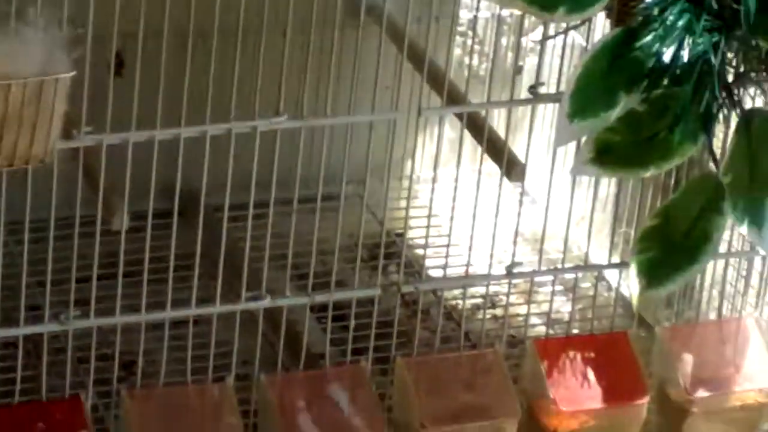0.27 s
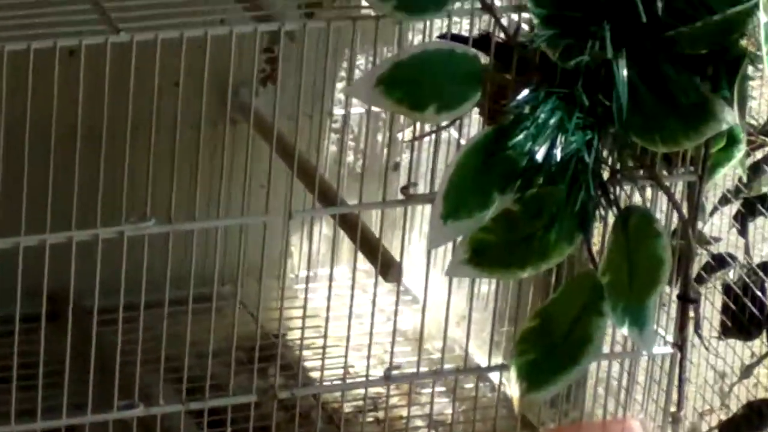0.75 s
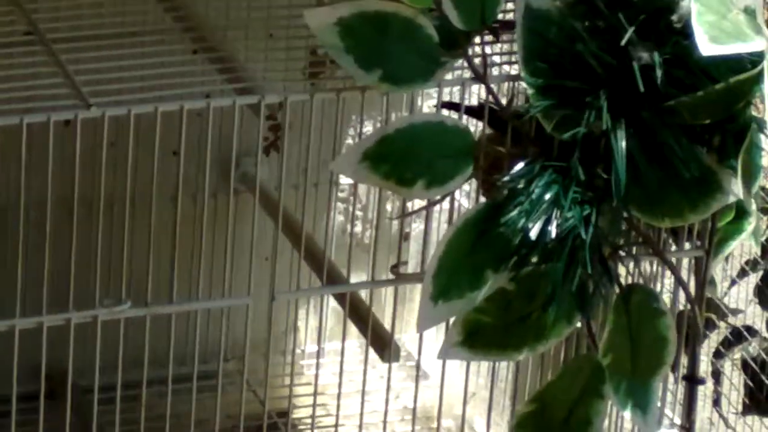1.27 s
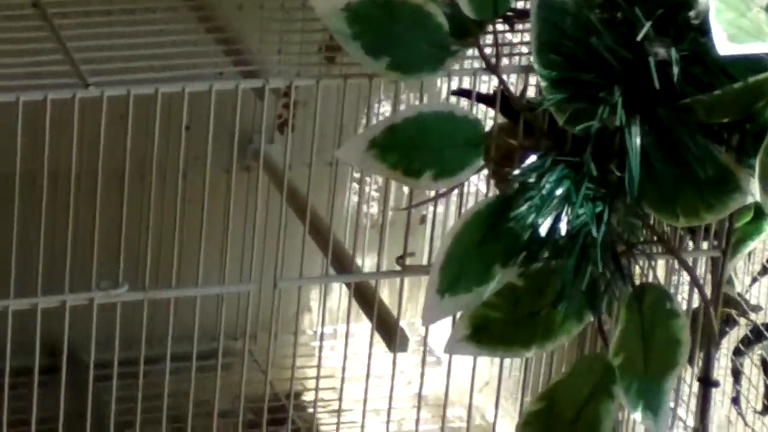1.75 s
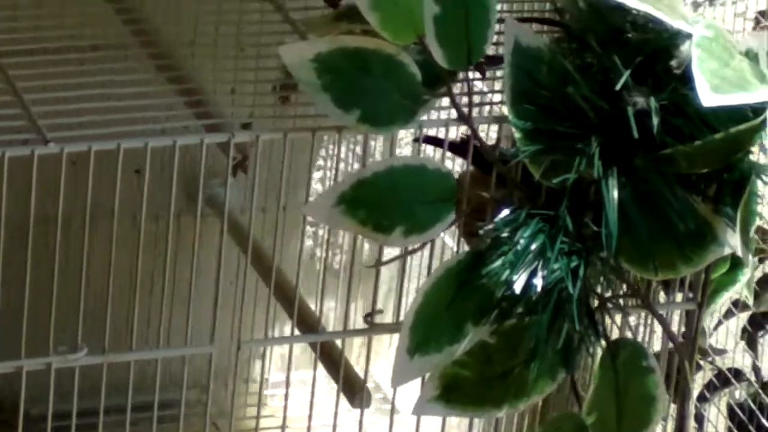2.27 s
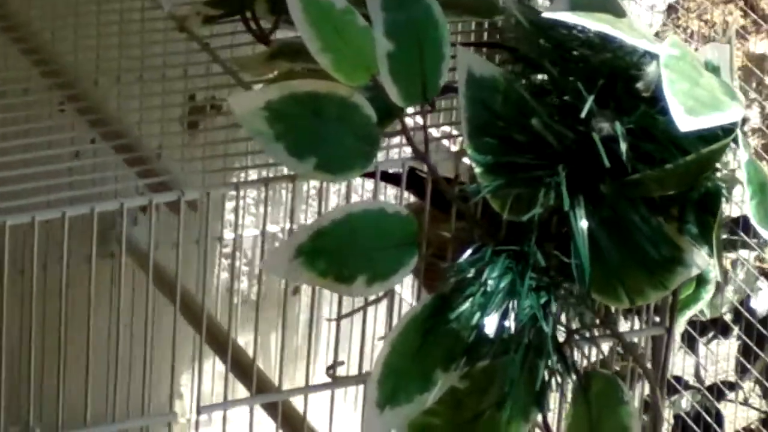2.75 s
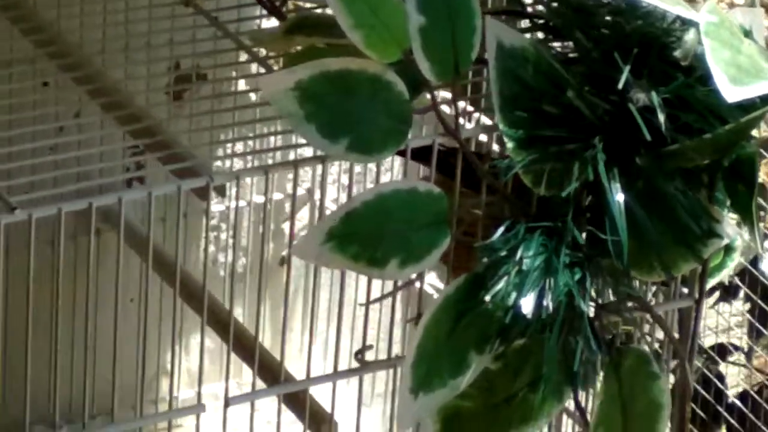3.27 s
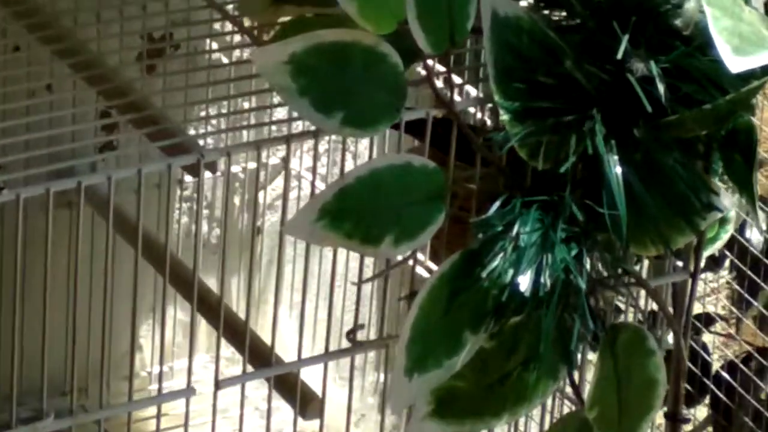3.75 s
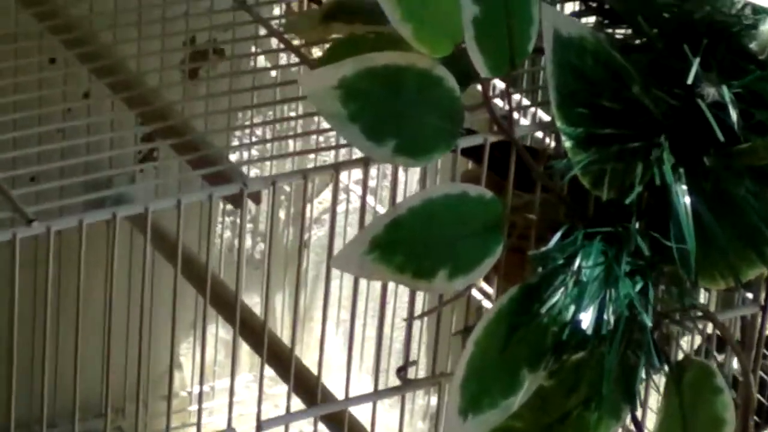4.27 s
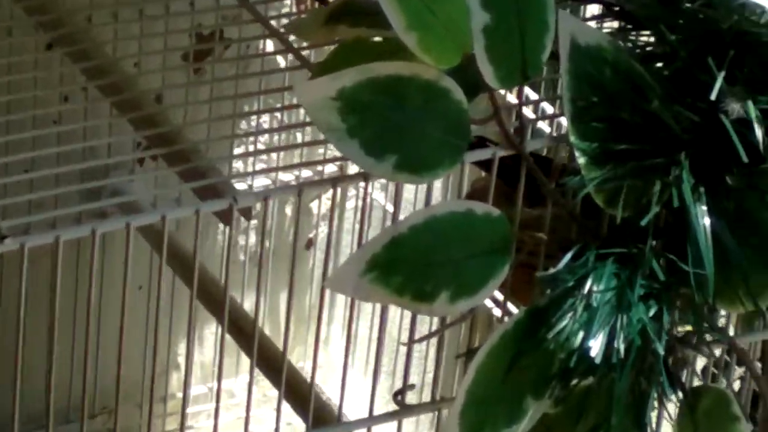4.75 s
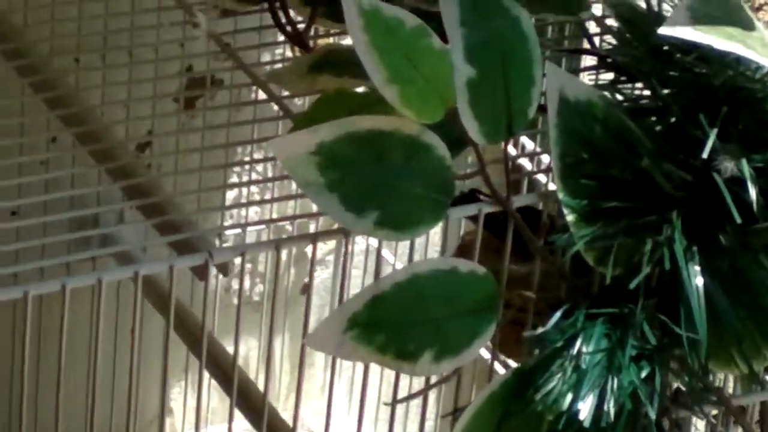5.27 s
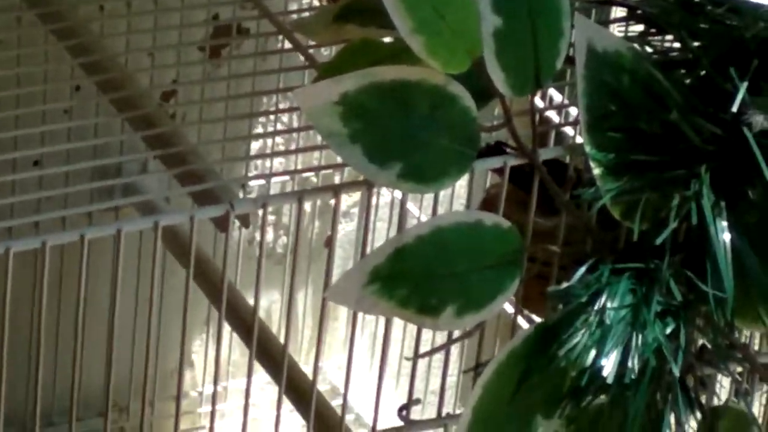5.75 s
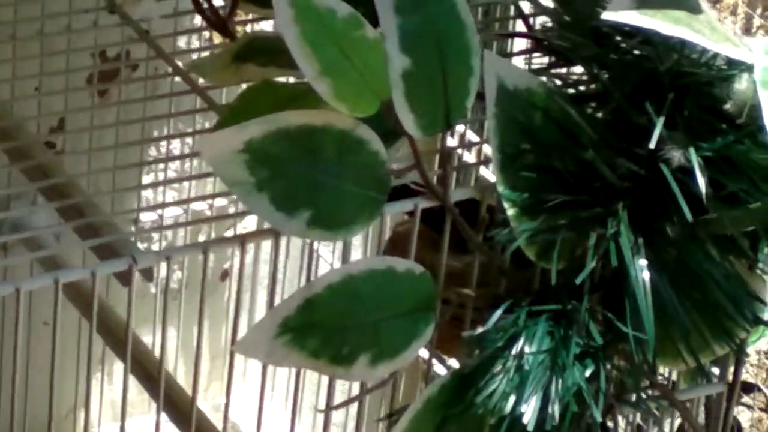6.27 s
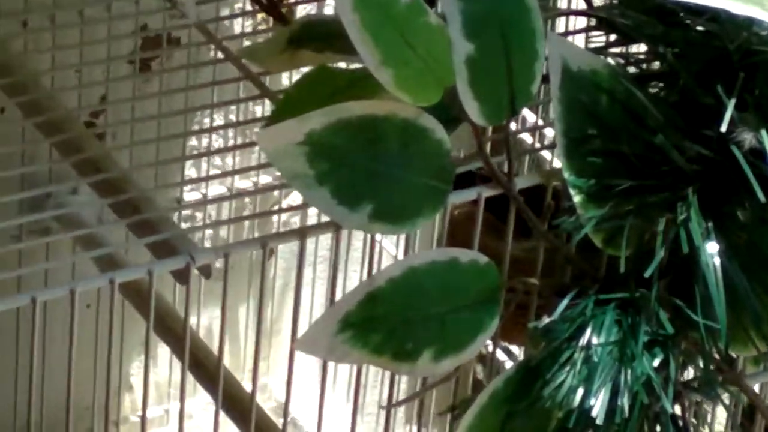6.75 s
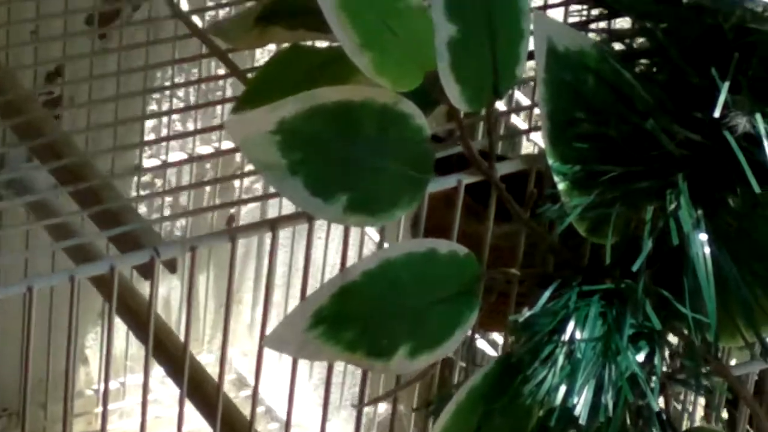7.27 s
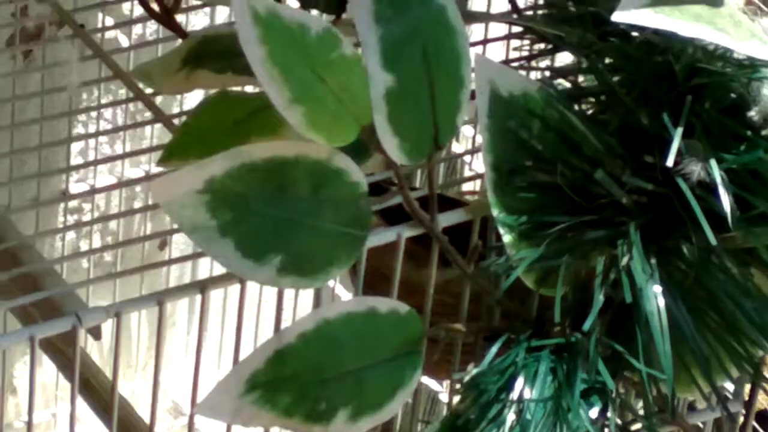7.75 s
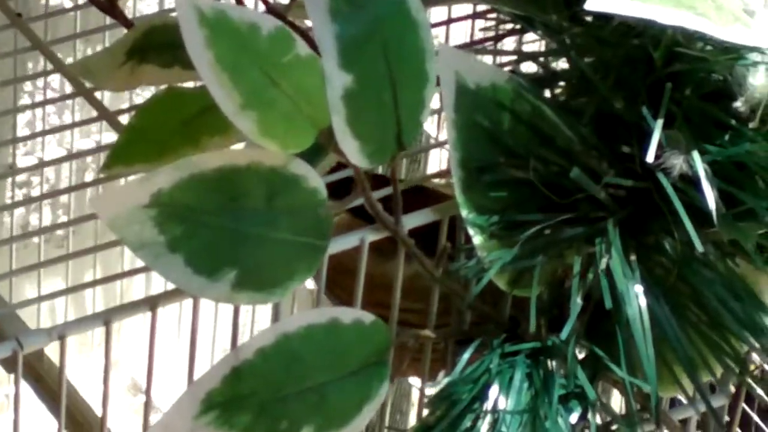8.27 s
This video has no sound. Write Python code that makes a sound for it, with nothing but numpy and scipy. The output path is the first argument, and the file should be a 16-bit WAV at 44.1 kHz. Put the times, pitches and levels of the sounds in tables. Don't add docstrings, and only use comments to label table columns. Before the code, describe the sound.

Small finches in a wire aviary with hard walls. Faint distant chirps and falling whistles come first, then two loud plastic ticks of fingers on the camera. Low chips and a soft flurry of wings follow, then spaced quick high tweets. A denser burst near the end brings a rising glide, a short buzz and a falling whistle, then another dull tick. Quiet room air, mono, close hand-held microphone.

```python
import sys
import numpy as np
from scipy import signal
from scipy.fft import rfft, irfft, next_fast_len
from scipy.io import wavfile
from scipy.ndimage import map_coordinates

SR = 44100
rng = np.random.default_rng(int(sys.argv[2]) if len(sys.argv) > 2 else 0)


def unload_audio(sound):
    columns = np.transpose(np.atleast_2d(sound))
    steps = np.round(np.clip(columns, -1, 1) * 32767)
    wavfile.write(sys.argv[1], SR, steps.astype(np.int16))


def amplitude_ratio(level_db):
    exponent = np.asarray(level_db, float) / 20
    return 10 ** exponent


N = 375732
TOP_HZ = 15850

# start_s, length_s, start_hz, end_hz, level_db
HOOK_NOTES = [(2.845, .026, 6400, 6856, -23), (2.845, .025, 5543, 6023, -26),
              (2.988, .015, 4400, 5379, -23.5), (2.988, .017, 3700, 4550, -29),
              (4.109, .021, 3605, 4791, -26), (5.475, .03, 3750, 4480, -16.5),
              (5.474, .025, 5090, 5374, -42), (7.152, .023, 6314, 6904, -20),
              (7.155, .024, 5652, 6026, -29.5), (7.266, .0214, 4580, 5270, -38),
              (7.475, .0216, 3580, 4338, -29)]
EVEN_RISES = [
    (1.329, .027, 4500, 5268, -28.5),
    (1.331, .018, 3440, 4468, -32.5),
    (4.205, .0427, 2960, 4500, -20),
    (5.319, .0194, 2900, 4278, -25),
    (5.333, .012, 2696, 3690, -31.5),
    (5.416, .031, 2500, 3423, -26),
    (7.765, .02, 3420, 2271, -29.5),
]
FLICK_NOTES = [
    (4.122, .014, 4535, 8190, -29.5),
    (7.378, .0156, 2746, 3700, -22),
    (7.378, .024, 2323, 2633, -30.5),
    (7.47, .0227, 4616, 5163, -19),
    (7.746, .021, 3115, 5807, -15.5),
]
DROP_NOTES = [
    (7.28, .017, 7200, 3900, -17.5),
    (7.926, .0237, 8160, 4180, -23.5),
]
SLIDE_NOTES = [
    (4.853, .016, 6500, 5950, -31),
    (4.857, .012, 7600, 7000, -36),
    (5.593, .026, 6400, 5720, -24),
    (5.658, .027, 4200, 3480, -21.5),
]
# start_s, start_hz, end_hz, level_db
LOW_CHIPS = [
    (1.229, 1761, 3650, -31),
    (1.432, 1801, 3600, -29),
    (3.102, 1800, 3600, -29.5),
    (3.415, 1900, 3800, -46),
    (7.715, 1659, 2300, -34.5),
]
# start_s, start_hz, end_hz, level_db
FAINT_CHIPS = [
    (4.53, 1788, 3750, -42),
    (4.905, 2000, 3950, -41),
    (7.005, 1910, 3700, -38.5),
    (7.092, 2600, 3600, -33.5),
    (8.318, 1907, 3850, -45.5),
    (8.46, 1993, 3750, -42),
]
PITCH_BEND = dict(hooks=2.5, rises=.75, flicks=-.8, drops=7.5, slides=2.8, chips=-.3, pips=1.7, series=3, far=1.8, dips=5.5)

# time_s, pitch_hz, level_db
GLIDE_CURVE = [(7.17, 1909, -49), (7.205, 2223, -39), (7.295, 2570, -45), (7.315, 2650, -29),
               (7.37, 2979, -40.5), (7.47, 3305, -38.5), (7.535, 3666, -20), (7.562, 3736, -14.5),
               (7.58, 3684, -34)]
ANSWER_CURVE = [(7.162, 2847, -42.5), (7.175, 2940, -30), (7.2, 2964, -41), (7.235, 3152, -45),
                (7.275, 3387, -41)]
FALL_CURVE = [(7.835, 3129, -41.5), (7.85, 3015, -24), (7.875, 2865, -20), (7.9, 2854, -30),
              (7.93, 2809, -29.5)]
BUZZ_CURVE = [(7.362, 1531, -47), (7.39, 1535, -31.5), (7.415, 1560, -26), (7.445, 1565, -27),
              (7.47, 1596, -30.5)]
RASP_CURVE = [(7.468, 1590, -31), (7.49, 1624, -25.5), (7.515, 1629, -30.5), (7.54, 1624, -41)]
# multiple of the pitch, level_db
BUZZ_PARTIALS = [(3, 2.5), (4, -13), (5, -3), (6, -15), (7, -23.5), (8, -29), (9, -20.5), (10, -26)]
# frequency_hz, gain_db
THROAT_GAIN = [(1500, -14), (2500, -7), (3500, 1.5), (6000, -0.5), (8000, -7), (10000, -4.5), (13000, 4),
               (16000, -1.5)]

# start_s, end_hz, level_db
HIDDEN_SERIES = [
    (2.17, 4780, -42),
    (2.286, 4930, -42),
    (2.386, 4930, -41),
    (2.512, 4880, -42.5),
    (3.63, 4820, -43.5),
    (3.736, 4900, -41.5),
    (3.843, 4820, -42.5),
]
# start_s, length_s, start_hz, end_hz, level_db
FAR_NOTES = [(.0, .01, 4700, 4150, -37), (.01, .03, 2602, 3820, -50), (.325, .03, 2200, 4400, -51),
             (.448, .035, 4200, 4720, -43.5), (.54, .035, 2392, 4590, -58), (1.375, .035, 4000, 4500, -40),
             (1.495, .03, 4210, 4800, -43), (2.235, .034, 5260, 5873, -62), (.905, .1, 2900, 2580, -53),
             (6.142, .03, 2500, 3980, -43), (6.235, .03, 3300, 3950, -42), (6.3, .04, 2400, 3900, -48),
             (7.13, .035, 2352, 2500, -41), (7.715, .025, 3400, 3700, -36), (7.72, .025, 4100, 4500, -37)]
# start_s, length_s, start_hz, end_hz, level_db
CLEAR_DIPS = [
    (.1, .075, 3650, 2870, -36),
    (.478, .038, 3600, 2650, -33),
    (.745, .085, 4000, 2600, -56),
    (.885, .15, 2700, 2620, -58),
    (3.232, .04, 2900, 2800, -38),
    (5.445, .025, 1250, 1100, -36),
    (7.878, .052, 5780, 5680, -36),
]

# time_s, flap_db, swish_db, fade_s (seconds to fade 20 dB)
WING_BEATS = [(.085, -54, -64, .15), (.94, -51, -60, .12), (1.05, -53, -65, .09), (1.578, -44, -60, .04),
              (1.625, -38, -48, .09), (1.722, -36, -43, .12), (1.815, -43, -56, .12), (1.87, -44, -52, .1),
              (1.935, -43, -57, .2), (2.08, -43, -53, .11), (2.53, -44, -62, .12), (3.44, -70, -73, .1),
              (5.79, -62, -70, .3), (6.282, -49, -50, .08), (6.375, -54, -61, .12)]
# time_s, level_db, fade_s (seconds to fade 20 dB)
SOFT_HOPS = [(.03, -57, .06), (.338, -54, .07), (.43, -55, .13), (.6, -59, .05), (.715, -57, .07),
             (2.21, -51, .1), (2.26, -54, .1), (2.585, -47, .1), (2.695, -57, .05), (3.01, -62.5, .08),
             (3.12, -68, .25), (3.39, -68, .06), (3.5, -61, .06), (3.84, -71, .9), (4.355, -65, .04),
             (4.59, -59, .05), (4.91, -63, .07), (5.19, -69.5, .2), (5.33, -57.5, .06), (5.46, -54, .03),
             (5.685, -44, .12), (5.9, -66, .25), (6.19, -64.5, .06), (6.415, -49, .09), (7.32, -61, .2),
             (7.42, -49, .15), (7.74, -61, .03), (7.8, -53.5, .15), (7.86, -55, .25), (8.168, -61, .03)]
# time_s, level_db, fade_s (seconds to fade 20 dB)
WIRE_CLAWS = [(.21, -72, .3), (.4, -72, .3), (.484, -68, .3), (.72, -73, .03), (3.94, -71.5, .3),
              (4.755, -73, .06), (4.83, -72, .03), (5.152, -75, .15), (5.9, -72, .4), (6.09, -76, .05)]
# frequency_hz, density_db
FLAP_SPECTRUM = [(120, -28.5), (300, -20), (600, -19), (900, -9), (1200, -4), (1700, 1.5), (2300, -1.5),
                 (3000, -10.5), (4500, -22.5)]
# frequency_hz, density_db
SWISH_SPECTRUM = [(1500, -7.5), (2500, 5), (4000, 1.5), (5500, -2.5), (8000, 2), (11000, -2.5),
                  (13000, -10), (15800, -15.5)]

# time_s, tick_db, dulling_hz, thud_db
CAMERA_TICKS = [
    (.41, -51, 6000, -79),
    (0.7321, -32, 2500, -62),
    (0.8467, -21, 6000, -37.5),
    (2.21, -66.5, 900, -51.5),
    (8.138, -24.5, 900, -61),
    (8.449, -57, 3000, -77),
]
# frequency_hz, level_db, decay_s (to -60 dB)
CASE_MODES = [
    (510, -9, 0.00753),
    (1194, -11, 0.0091),
    (2500, -4, 0.00602),
    (4500, -12, 0.0024),
]
# frequency_hz, density_db
AIR_SPECTRUM = [(12, -32), (20, 3.5), (848, -13), (1000, -21), (1250, -14), (2020, -27.5), (2190, -22.5),
                (2390, -29), (4060, -20), (5220, -24.5), (10500, -25.5), (16000, -33)]


def finches():
    glide = held(GLIDE_CURVE, [(1, 5.0), (2, -24.5), (3, -33.5), (4, -48.5)],
                 rough_db=-28.5, walls_db=-1, tail_db=-13.5)
    answer = held(ANSWER_CURVE, [(0.997, 1.5)], rough_db=-27.5, walls_db=-9.5, tail_db=-16.5)
    fall = held(FALL_CURVE, [(1, 5.0), (2, -30), (3, -28), (4, -36)],
                rough_db=-25.5, walls_db=-2.5, tail_db=-15)
    buzz = held(BUZZ_CURVE, BUZZ_PARTIALS, rough_db=-46, walls_db=-5, tail_db=-6)
    duller = [(k, db - 3.1 * k) for k, db in BUZZ_PARTIALS]
    rasp = held(RASP_CURVE, duller, rough_db=-27, walls_db=-2, tail_db=-10.5)
    return near_notes() + chips() + far_notes() + glide + answer + fall + buzz + rasp


def near_notes():
    shapes = [(HOOK_NOTES, "hooks", 6), (EVEN_RISES, "rises", 4), (FLICK_NOTES, "flicks", 1.5),
              (DROP_NOTES, "drops", .1), (SLIDE_NOTES, "slides", 1.5)]
    out = np.zeros(N)
    for notes, shape, grow_db in shapes:
        out += sweeps(notes, PITCH_BEND[shape], [(1, -3), (2, -30), (3, -42.5)],
                      rough_db=-17.5, walls_db=5.5, tail_db=-4, grow_db=grow_db)
    return out


def chips():
    out = np.zeros(N)
    for rows, length_s, shape, grow_db in [(LOW_CHIPS, .027, "chips", 11), (FAINT_CHIPS, .028, "pips", .1)]:
        notes = [(s, length_s, *rest) for s, *rest in rows]
        out += sweeps(notes, PITCH_BEND[shape], [(1, -2.5), (2, -33), (3, -44)],
                      rough_db=-13.5, walls_db=8, tail_db=-2.5, grow_db=grow_db)
    return out


def far_notes():
    length_s, start_hz = .034, 2580
    series = [(s, length_s, start_hz, end_hz, db) for s, end_hz, db in HIDDEN_SERIES]
    hidden = sweeps(series, PITCH_BEND["series"], [(1, -1), (2, -42)],
                    rough_db=-12, walls_db=11, tail_db=9, grow_db=3)
    far = sweeps(FAR_NOTES, PITCH_BEND["far"], [(1, -1), (2, -38.5)],
                 rough_db=-11, walls_db=7.5, tail_db=4, grow_db=3)
    clear = sweeps(CLEAR_DIPS, PITCH_BEND["dips"], [(1, -1)],
                   rough_db=-14, walls_db=-1.5, tail_db=-17, grow_db=-1.5)
    return hidden + far + clear


def sweeps(notes, bend, partials, rough_db, walls_db, tail_db, grow_db):
    absorb_db_per_s = .9
    out = np.zeros(N)
    for (s, length_s, start_hz, end_hz, db), room in zip(notes, rooms(len(notes), walls_db, tail_db)):
        u = np.arange(SR // 4) / SR / length_s
        u = u[u < 1]
        hz = start_hz + (end_hz - start_hz) * np.expm1(-bend * u) / np.expm1(-bend)
        swell = np.sin(np.pi * u ** 1.529) ** 0.2795 * amplitude_ratio(grow_db * (u - .5))
        note = swell * whistle(hz, db, partials, rough_db)
        loss_db = absorb_db_per_s * (end_hz / 1000) ** 2 * np.arange(len(room)) / SR
        add(out, s, signal.fftconvolve(note, room * amplitude_ratio(-loss_db)))
    return out


def held(rows, partials, rough_db, walls_db, tail_db):
    s, hz, db = np.transpose(rows)
    t = np.arange(s[0], s[-1], 1 / SR)
    tone = whistle(np.interp(t, s, hz), np.interp(t, s, db), partials, rough_db)
    tone = signal.windows.tukey(len(t), .08) * tone
    out = np.zeros(N)
    add(out, s[0], signal.fftconvolve(tone, rooms(1, walls_db, tail_db)[0]))
    return out


def whistle(hz, db, partials, rough_db):
    phase = 2 * np.pi * np.cumsum(hz) / SR
    fuzz = amplitude_ratio(rough_db) * breath(count=len(hz), width_hz=394)
    out = np.zeros(len(hz))
    for k, level_db in partials:
        gain = amplitude_ratio(db + level_db + along(THROAT_GAIN, k * hz)) * (k * hz < TOP_HZ)
        out += gain * np.imag((1 + k ** 2 * fuzz) * np.exp(1j * k * phase))
    return out


def breath(count, width_hz):
    z = [1, 1j] @ rng.standard_normal((2, SR // 2))
    z = signal.lfilter(*signal.butter(3, width_hz, fs=SR), z)
    return z[:count] / np.std(z)


def rooms(count, walls_db, tail_db):
    t = np.arange(SR * 2 // 3) / SR
    early, late = rng.standard_normal((2, count, len(t)))
    burst = early * amplitude_ratio(-60 * t / 0.0553) * np.clip(t / 0.01211, 0, 1) ** 2
    dull = signal.lfilter([1], [1, -.6], late)
    tail = dull * amplitude_ratio(-60 * t / 0.3826) * np.clip(t / 0.026, 0, 1)
    out = amplitude_ratio(walls_db) * burst / np.linalg.norm(burst[0]) + amplitude_ratio(tail_db) * tail / np.linalg.norm(tail[0])
    out[:, 0] = 1
    return out


def rustle():
    soft = strokes(SOFT_HOPS + [(s, db, fade_s) for s, db, _, fade_s in WING_BEATS])
    sharp = strokes(WIRE_CLAWS + [(s, db, .7 * fade_s) for s, _, db, fade_s in WING_BEATS])
    stir_db = -84
    flutter = amplitude_ratio(2.0 + 1.8 * wobble(40) + 1.2 * wobble(250))
    grain = amplitude_ratio(3.5 + 2.3 * wobble(70) + 1.855 * wobble(700))
    flaps = (soft + amplitude_ratio(stir_db)) * flutter * noise(FLAP_SPECTRUM)
    return flaps + sharp * grain * noise(SWISH_SPECTRUM)


def strokes(rows):
    rise_db_per_s, hold_s = 900, .024
    t = np.arange(0, N + SR, SR // 1000) / SR
    power = np.zeros(len(t))
    for s, db, fade_s in rows:
        rise_db = rise_db_per_s * (t - s + hold_s / 2)
        fall_db = -20 * (t - s - hold_s / 2) / fade_s
        shape_db = np.minimum(0, np.minimum(rise_db, fall_db))
        power += amplitude_ratio(db + shape_db) ** 2
    return np.interp(np.arange(N) / SR, t, np.sqrt(power))


def handling():
    out, t = np.zeros(N), np.arange(SR // 10) / SR
    ring = sum(amplitude_ratio(db - 60 * t / decay_s) * np.sin(2 * np.pi * hz * t) for hz, db, decay_s in CASE_MODES)
    case = ring * np.clip(t / 0.000676, 0, 1) * 3
    push = np.exp(-((t - .022) / 0.0119) ** 2) * np.sin(2 * np.pi * 38 * (.024 - t))
    for s, tick_db, dulling_hz, thud_db in CAMERA_TICKS:
        tick = signal.lfilter(*signal.butter(2, min(dulling_hz, 20000), fs=SR), case)
        add(out, s, amplitude_ratio(tick_db) * tick + amplitude_ratio(thud_db) * push)
    return out


def room_air():
    return amplitude_ratio(-67.5 + 1.0 * wobble(3)) * noise(AIR_SPECTRUM)


def noise(spectrum):
    m = next_fast_len(N)
    points = [(0.977, -120)] + spectrum + [(20000, -120)]
    gain = amplitude_ratio(along(points, np.fft.rfftfreq(m, 1 / SR)))
    x = irfft(rfft(rng.standard_normal(m)) * gain, m)[:N]
    return x / np.std(x)


def wobble(rate):
    knots = rng.standard_normal(int(N * rate / SR) + 4)
    return map_coordinates(knots, [np.arange(N) * rate / SR])


def along(points, hz):
    f, v = np.transpose(points)
    return np.interp(np.log(hz + 1), np.log(f + 1), v)


def add(out, s, x):
    part = out[round(s * SR):][:len(x)]
    part += x[:len(part)]


def scene():
    return (finches() + rustle() + handling() + room_air())[None]


def low_pass(x):
    return signal.sosfilt(signal.butter(12, 16130, fs=SR, output="sos"), x)


def record(dry):
    m = next_fast_len(N)
    in_band = np.fft.rfftfreq(m, 1 / SR) < TOP_HZ
    kept = irfft(rfft(dry, m) * in_band, m)[:, :N]
    return low_pass(kept)


dry = scene()
out = record(dry)
unload_audio(out)
```